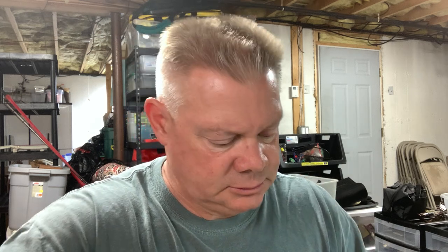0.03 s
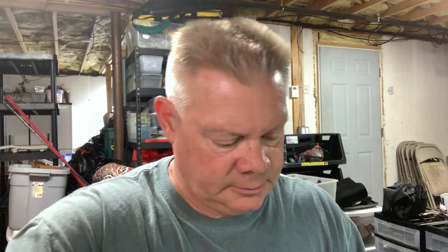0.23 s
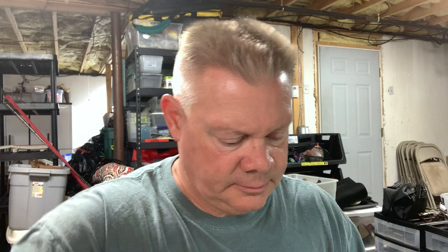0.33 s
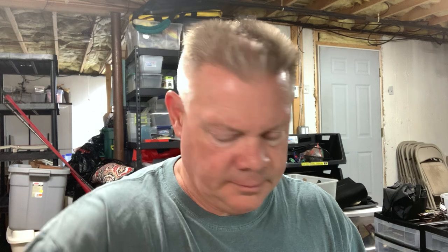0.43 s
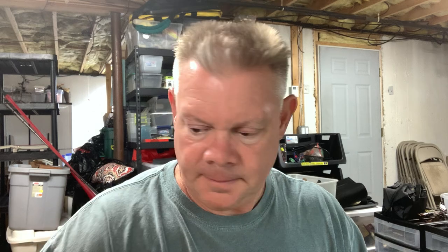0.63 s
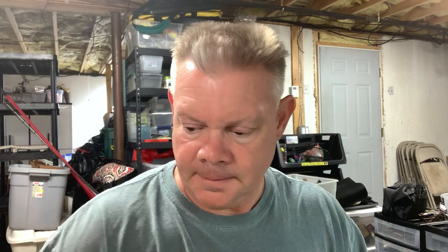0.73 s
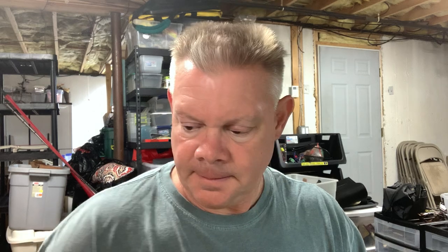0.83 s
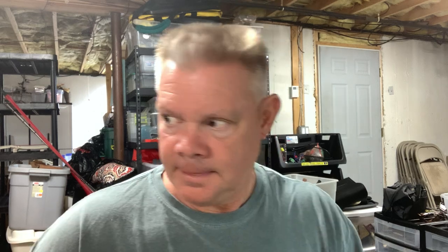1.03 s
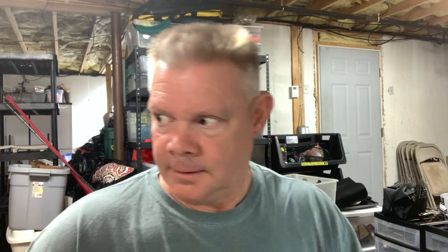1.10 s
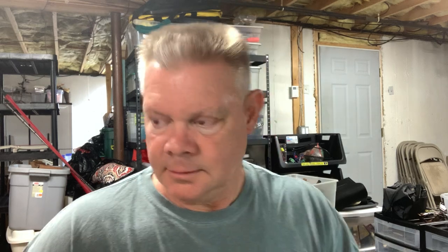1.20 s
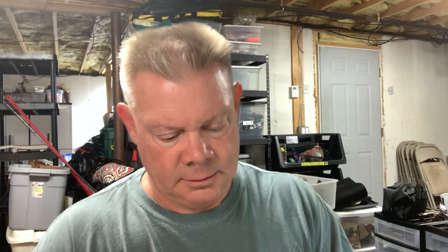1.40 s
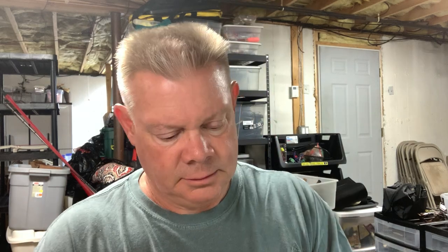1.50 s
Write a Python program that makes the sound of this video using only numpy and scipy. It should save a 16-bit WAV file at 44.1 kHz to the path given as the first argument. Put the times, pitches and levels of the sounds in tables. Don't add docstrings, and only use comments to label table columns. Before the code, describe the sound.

Scissors cut stiff plastic packaging, close up in a basement. Tiny crinkles at 0.02-0.14 s; from 0.2 to 0.43 s a first bite snaps and rustles, loudest near 0.3 s, with hollow knocks and a soft bench thud. At 0.65-0.75 s blades slide with a bright hiss. A second bite cracks at 1.2-1.28 s, then a short edge scrape at 1.43 s and last crinkles to 1.55 s. Faint low hum pulses throughout.

```python
import sys
import numpy as np
from scipy import signal
from scipy.fft import rfft, irfft
from scipy.io import wavfile
from scipy.ndimage import uniform_filter1d

SR = 44100
rng = np.random.default_rng(int(sys.argv[2]) if len(sys.argv) > 2 else 0)


def voltage_ratio(decibels):
    exponent = np.asarray(decibels, float) / 20
    return 10 ** exponent


def to_wav(s):
    ch = np.atleast_2d(s).T
    pcm = np.round(np.clip(ch, -1, 1) * 32767)
    wavfile.write(sys.argv[1], SR, pcm.astype(np.int16))


N = 68355

# (frequency [Hz], density [dB per Hz])
FLOOR_SPECTRUM = [(76, -35), (130, -9), (207, -16), (349, -13), (522, -21.5), (589, -21.5), (974, -26),
                  (1270, -26.5), (16000, -37.5)]
# (time [s], level [dB])
FLOOR_LEVEL = [(0, 6), (.17, 3.5), (.48, 1), (.63, -2.5), (.8, 0), (1.55, 6.5)]
# (frequency [Hz], rms [dB], other frequency [Hz], other rms [dB], cancelling time [s])
MOTOR_PAIRS = [(53.15, -64.8, 58.55, -63.1, .180), (117.3, -68, 120.15, -66.5, .19)]
# (frequency [Hz], width [Hz], rms [dB])
HUM_BANDS = [(118, 2, -88.5), (183, 35, -79)]
# (frequency [Hz], t60 [s])
ROOM_DECAY = [(150, 0.61), (500, 0.23), (2000, 0.13), (6000, 0.11), (14000, 0.12)]
# (time [s], level [dB], frequency [Hz], t60 [s])
BENCH_BUMPS = [
    (0.206, -40, 130, 0.081),
    (0.29, -36, 127.3, 0.13),
    (0.318, -30.5, 124, 0.11),
    (0.337, -42.5, 83, 0.27),
    (0.383, -40, 118, 0.35),
    (0.65, -35.5, 76.4, 0.074),
    (0.678, -43.5, 127, 0.09),
    (1.253, -53, 173.4, 0.14),
]
# (time [s], level [dB])
DRAG_LEVEL = [(1.385, -73), (1.392, -80), (1.41, -70), (1.418, -56), (1.423, -59), (1.427, -46.5),
              (1.433, -56), (1.443, -60.5), (1.462, -71)]
# (frequency [Hz], width [Hz], level [dB])
EDGE_RESONANCES = [(1490, 260, -3), (2750, 600, 0), (3770, 400, -8), (4700, 400, -7), (5800, 700, -4),
                   (8100, 900, -8), (9230, 400, -10), (10200, 500, -5)]
# (time [s], level [dB])
SQUEEZES = [
    [(.2, -76), (.235, -59), (.275, -68), (.29, -44), (.33, -48), (.39, -51), (.43, -65), (.465, -72.5)],
    [(1.186, -66.5), (1.22, -47), (1.26, -74), (1.32, -58.5), (1.37, -79.5), (1.405, -62), (1.43, -83),
     (1.465, -79), (1.55, -81)],
]
# (frequency [Hz], density [dB per Hz])
RUSTLE_SPECTRUM = [(200, -34), (500, -1.5), (1100, 5), (1500, 2), (2500, 4.5), (4500, -5), (9000, -12.5),
                   (16000, -12)]
# (time [s], level [dB])
SLIDE_LEVEL = [(.647, -65.5), (.66, -51), (.69, -54), (.710, -50.5), (.718, -52.5), (.738, -51.5),
               (.746, -69), (.78, -73)]
# (frequency [Hz], density [dB per Hz])
STEEL_SPECTRUM = [(350, -38), (600, -12.5), (957, -16.5), (1110, -23.5), (3300, -14), (3580, -16.5),
                  (7210, -10), (16000, -12)]
# (time [s], peak [dB], burst length [s], pitch of the struck spot [Hz])
PACK_KNOCKS = [(0.202, -42, 0.017, 400), (0.224, -34, 0.0083, 730), (0.2877, -21.5, .002, 440),
               (0.2908, -31, .002, 704), (0.294, -38, 0.0014, 684), (0.2978, -30, 0.0054, 350),
               (0.312, -40, 0.0066, 450), (0.331, -33, 0.014, 418), (.347, -39, 0.004, 380),
               (0.362, -33.5, 0.0072, 414), (0.384, -35.5, 0.0056, 416), (0.398, -40, 0.0059, 564),
               (0.422, -45, 0.0059, 424), (0.432, -45, 0.0099, 446), (0.644, -50, 0.0085, 570),
               (.653, -47, 0.0082, 355), (1.198, -41, 0.0061, 298), (1.212, -36.5, 0.0054, 323),
               (1.244, -42.5, 0.011, 790), (1.28, -46, .0066, 340), (1.339, -52.5, 0.0054, 455)]
# (frequency [Hz], level [dB], t60 [s])
PACK_MODES = [(250, -7, .04), (352, -1, .05), (447, 0, .055), (520, -6, .045), (581, -3, .045),
              (668, -4, .05), (750, -4, .045), (890, -6, .035)]
# (frequency [Hz], level [dB], t60 [s])
SHEET_MODES = [(950, -8, .03), (1820, -8, .02), (2050, -6, .022), (2300, -5, .022), (2685, -3, .024),
               (3200, -4, .016), (3750, -5, .014), (4350, -5, .012), (5100, -5, .011), (6050, -5, .011),
               (6900, -7, .011), (8300, -7, .011)]
# (time [s], level [dB], panel pitch [Hz], tilt [dB per octave], burst length [s])
SHEET_SNAPS = [(.2010, -50.5, 2930, 2, 0.0023), (0.203, -39.5, 1340, -0.5, 0.0028),
               (0.2218, -32, 3090, -8, 0.004), (0.2856, -26.5, 4900, 2, 0.0021),
               (.2862, -31, 2500, -2, 0.0025), (0.315, -17, 2830, 3, 0.0021),
               (0.316, -27, 6760, -1, 0.0008), (0.3198, -24, 1060, 0, 0.0039),
               (0.328, -32, 2300, -7, 0.0013), (0.338, -51, 2314, 2, 0.0012),
               (0.362, -40.5, 2320, -8, 0.0027), (0.367, -33, 1880, -2, 0.0043),
               (0.3875, -46, 2320, 12, 0.01), (1.1967, -54, 3000, 3, 0.0016),
               (1.1985, -36.5, 1960, -3, 0.003), (1.2131, -29.5, 3350, -13.5, 0.0042),
               (1.2156, -22, 2780, -3, 0.0018), (1.2185, -36, 2560, -4, 0.0044),
               (1.2440, -23.5, 3460, 1, 0.0012), (1.226, -39.5, 2900, -3, 0.0051),
               (1.213, -39, 2570, 0, 0.0035), (1.2459, -31, 2060, 0.5, 0.0052),
               (1.2781, -38, 3730, -3, 0.003), (1.28, -36, 2150, -4, 0.0039)]
# (time [s], level [dB], panel pitch [Hz], tilt [dB per octave])
SHEET_CRINKLES = [(.0245, -57, 6400, -2), (.0303, -51, 6100, -4), (.036, -55, 6300, -3),
                  (.0600, -46, 8100, 1), (.063, -45, 13800, 4), (.1236, -48, 12700, 4),
                  (.134, -52, 8000, 2), (.6426, -41, 7000, 1), (.6447, -40, 5000, 3),
                  (.6485, -52, 2000, -6), (.1395, -48, 6200, 1), (.208, -44, 2500, -1),
                  (.217, -44, 2900, 0), (.248, -47, 2000, 0), (.457, -60, 2000, 0), (.770, -56, 5000, -3),
                  (1.237, -40, 2500, 1), (1.308, -50, 6000, -3), (1.293, -48, 2000, -4),
                  (1.316, -48, 2300, -3), (1.358, -49, 2500, -6), (1.365, -52, 2000, -5),
                  (1.3408, -43, 3000, -5), (1.3503, -42, 3600, -7), (1.3875, -54, 3650, -4),
                  (1.398, -55, 4200, -2), (1.410, -51, 3900, -2), (1.4165, -49, 5800, 0),
                  (1.4245, -44, 1520, -9), (1.432, -46, 5500, 2), (1.440, -52, 10100, -4),
                  (1.512, -56, 3300, -3), (1.5180, -49, 2700, -1), (1.535, -51, 2300, -7),
                  (1.546, -48, 2900, -9)]

FLOOR_DB, ROOM_DB = -69.5, -11
STEEL_HZ, STEEL_WIDTH_HZ, STEEL_DB = 7200, 190, -14
SHEET_DB, SHEET_BEND = -8, 0.0079
PANEL_DB, PANEL_Q, DULL_HZ = -6, 4.3, 11300
SNAP_BELOW_DB, CRINKLE_BELOW_DB = 8.5, 11
CRINKLE_S = 0.0024
SPOT_DB = 12


def evened(x):
    return x / np.sqrt(np.mean(x ** 2) + 1e-20)


def read(points, hz):
    f, value = np.transpose(points)
    return np.interp(np.log(hz + 1), np.log(f + 1), value)


def shaped(x, points):
    gain = voltage_ratio(read(points, np.fft.rfftfreq(len(x), 1 / SR)))
    return evened(irfft(rfft(x) * gain, len(x)))


def envelope(curve):
    s, db = np.transpose(curve)
    return voltage_ratio(np.interp(np.arange(N) / SR, s, db, -150, -150))


def add(mix, s, sound):
    part = mix[round(s * SR):][:len(sound)]
    part += sound[:len(part)]


def modes(table, strength, bend=0, size=6000):
    t = np.arange(size)[:, None] / SR
    hz, db, t60 = np.transpose(table)
    decay = voltage_ratio(db - 60 * t / t60)
    ring = (strength * decay * np.sin(2 * np.pi * hz * (1 + bend) * t)).sum(1)
    return ring / np.linalg.norm(ring)


def burst(length, noise, rise=0.0003, crack=2.2):
    t = np.arange(len(noise)) / SR
    x = noise * (1 - np.exp(-t / rise)) * np.exp(-t / max(length, 3e-4))
    x[0] += crack
    return x


def crack_train(per_s, spread_db):
    size = voltage_ratio(spread_db * np.minimum(rng.exponential(1, N), 3))
    return size * (rng.random(N) < per_s / SR)


def room_floor():
    spectrum = [(60, -7.5), (110, -6.5)] + list(FLOOR_SPECTRUM)[1:]
    return voltage_ratio(FLOOR_DB) * shaped(rng.standard_normal(N), spectrum) * envelope(FLOOR_LEVEL)


def motors():
    t, out = np.arange(N) / SR, np.zeros(N)
    for hz, db, other_hz, other_db, null in MOTOR_PAIRS:
        turn = rng.random()
        tone = np.cos(2 * np.pi * (hz * (t - null) + turn))
        other = np.cos(2 * np.pi * (other_hz * (t - null) + turn))
        out += np.sqrt(2) * (voltage_ratio(db) * tone - voltage_ratio(other_db) * other)
    for hz, width, db in HUM_BANDS:
        band = np.exp(-((np.fft.rfftfreq(N, 1 / SR) - hz) / width) ** 2)
        out += voltage_ratio(db) * evened(irfft(rfft(rng.standard_normal(N)) * band, N))
    return out


def room(x):
    taps = np.zeros(SR // 2)
    at = np.arange(200, len(taps) - 20, 20)
    taps[at + rng.integers(0, 20, len(at))] = rng.choice([-1., 1.], len(at))
    hz, t, z = signal.stft(taps, SR, nperseg=256)
    decay = voltage_ratio(-60 * t / read(ROOM_DECAY, hz)[:, None])
    tail = signal.istft(z * decay, SR, nperseg=256)[1]
    return signal.fftconvolve(x, tail / np.linalg.norm(tail))[:N]


def bench():
    out, t = np.zeros(N), np.arange(SR // 3) / SR
    onset = 1 - np.exp(-t / 0.0068)
    for s, db, hz, t60 in BENCH_BUMPS:
        add(out, s, voltage_ratio(db - 60 * t / t60) * onset * np.sin(2 * np.pi * hz * t))
    return out


def drag():
    slips = crack_train(per_s=5400, spread_db=1) * rng.standard_normal(N)
    rings = np.zeros(N)
    for hz, width, db in EDGE_RESONANCES:
        rings += voltage_ratio(db) * evened(signal.lfilter(*signal.iirpeak(hz, hz / width, SR), slips))
    return evened(rings) * envelope(DRAG_LEVEL)


def rustle():
    cracks = crack_train(per_s=1400, spread_db=2)
    puffs = signal.lfilter([1], [1, -np.exp(-1 / (0.0012 * SR))], cracks)
    noise = (puffs + 0.56) * rng.standard_normal(N)
    return shaped(noise, RUSTLE_SPECTRUM) * sum(map(envelope, SQUEEZES))


def blades():
    hiss = rng.standard_normal(N)
    unevenness = evened(uniform_filter1d(rng.standard_normal(N), size=160))
    rub = hiss * voltage_ratio(2.2 * unevenness)
    ring = signal.lfilter(*signal.iirpeak(STEEL_HZ, STEEL_HZ / STEEL_WIDTH_HZ, SR), rub)
    return (shaped(rub, STEEL_SPECTRUM) + voltage_ratio(STEEL_DB) * evened(ring)) * envelope(SLIDE_LEVEL)


def pack():
    out, mode_hz = np.zeros(N), np.transpose(PACK_MODES)[0]
    for s, db, length, spot_hz in PACK_KNOCKS:
        bend = 0.012 * rng.standard_normal(len(PACK_MODES))
        push = burst(length, rng.standard_normal(2000), rise=0.0008, crack=22)
        near = voltage_ratio(-SPOT_DB * np.log2(mode_hz / spot_hz) ** 2)
        x = signal.fftconvolve(push, modes(PACK_MODES, near, bend))
        add(out, s, voltage_ratio(db) * x / abs(x).max())
    return out


def snap(db, hz, tilt_db, length, below_db, noise, detune):
    t = np.arange(1500) / SR
    panel = np.exp(-np.pi * hz / PANEL_Q * t) * np.sin(2 * np.pi * hz * t)
    strength, bend = np.tanh(2 * detune[0]), SHEET_BEND * detune[1]
    body = voltage_ratio(SHEET_DB) * modes(SHEET_MODES, strength, bend, size=3000)
    body[:len(t)] += voltage_ratio(PANEL_DB) * panel / np.linalg.norm(panel)
    body[0] += 1

    f = np.fft.rfftfreq(8192, 1 / SR)
    octaves = np.log2((f + 30) / hz)
    gain = voltage_ratio(np.where(octaves > 0, tilt_db, below_db) * octaves)
    gain = gain * f ** 2 / (f ** 2 + 234.0 ** 2) / (1 + (f / DULL_HZ) ** 2)
    log_gain = np.log(gain + 1e-4)
    phase = -signal.hilbert(np.r_[log_gain, log_gain[-2:0:-1]]).imag[:len(f)]
    colour = np.exp(log_gain + 1j * phase)
    x = irfft(rfft(burst(length, noise), 8192) * rfft(body, 8192) * colour)[:5000]
    return voltage_ratio(db) * x / np.linalg.norm(x) * np.sqrt(length * SR) / 2


def sheet():
    buckles = [(*row, SNAP_BELOW_DB) for row in SHEET_SNAPS]
    buckles += [(*row, CRINKLE_S, CRINKLE_BELOW_DB) for row in SHEET_CRINKLES]
    noises = rng.standard_normal((len(buckles), 2000))
    detunes = rng.standard_normal((len(buckles), 2, len(SHEET_MODES)))
    out = np.zeros(N)
    for (s, *buckle), noise, detune in zip(buckles, noises, detunes):
        add(out, s, snap(*buckle, noise, detune))
    return out


def scene():
    work = sheet() + pack() + rustle() + blades() + drag()
    floor = room_floor()
    return (work + voltage_ratio(ROOM_DB) * room(work) + bench() + motors() + floor)[None]


def top_cut(x):
    return signal.sosfilt(signal.butter(12, 16820, fs=SR, output="sos"), x)


def record(dry):
    x = signal.sosfilt(signal.butter(6, 46.4, "high", fs=SR, output="sos"), dry)
    treble_edge = signal.firwin(401, 15800, window=("kaiser", 5), fs=SR)
    x = signal.oaconvolve(x, treble_edge[None], "same")
    return top_cut(x)


dry = scene()
out = record(dry)
to_wav(out)
```